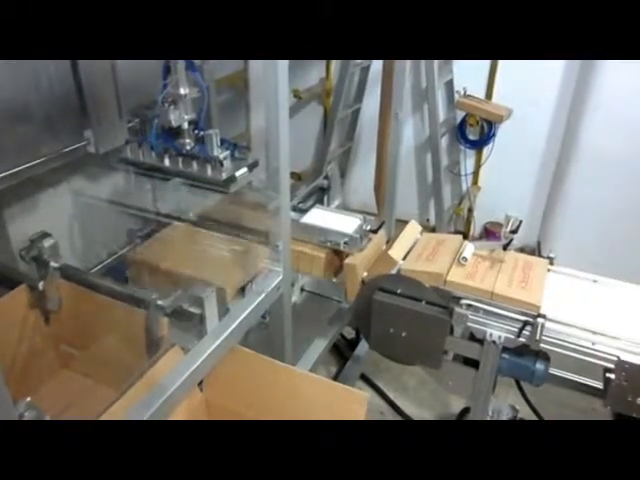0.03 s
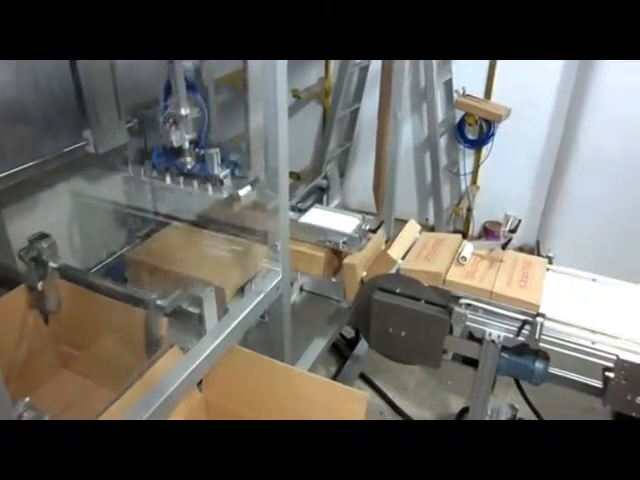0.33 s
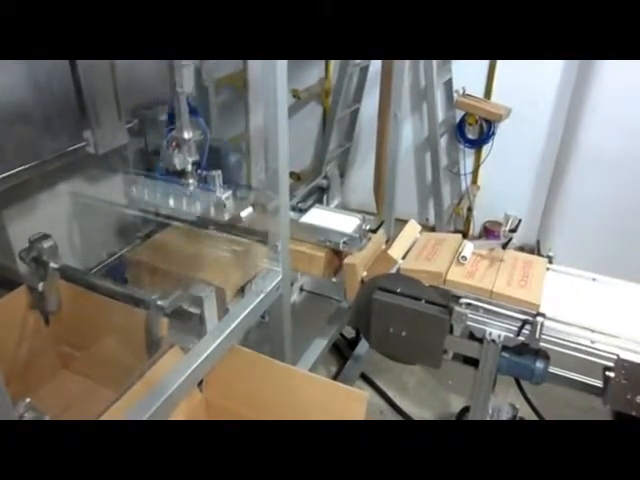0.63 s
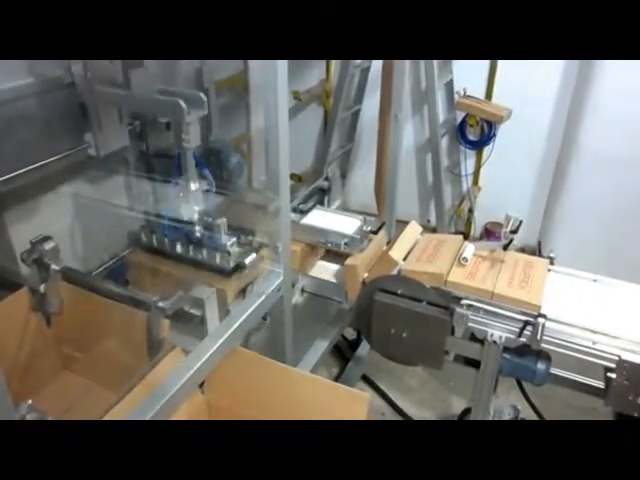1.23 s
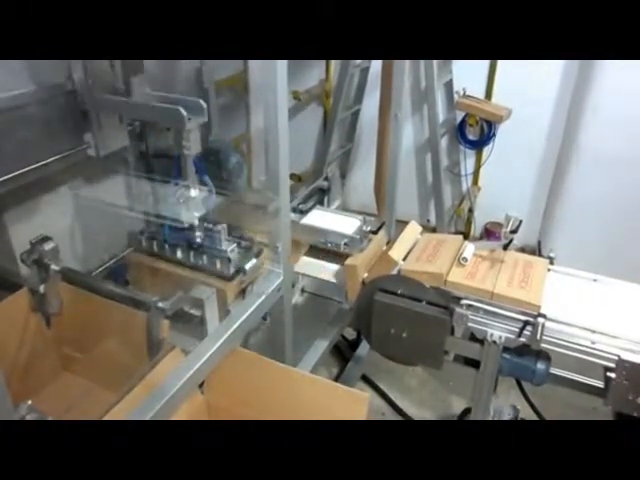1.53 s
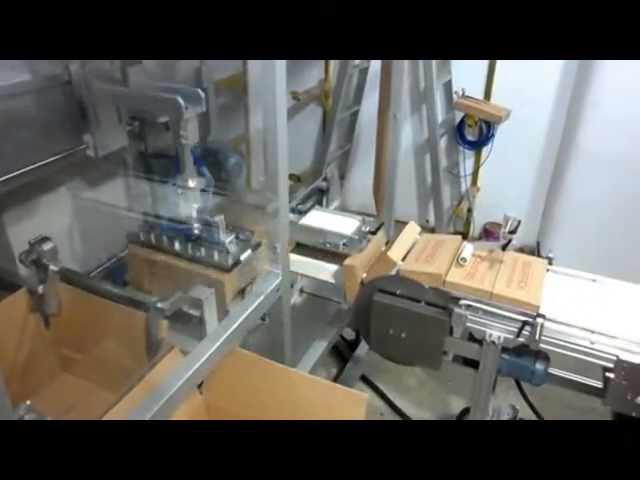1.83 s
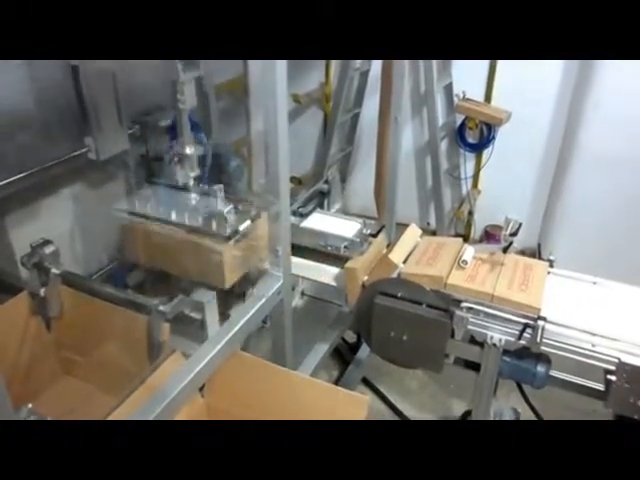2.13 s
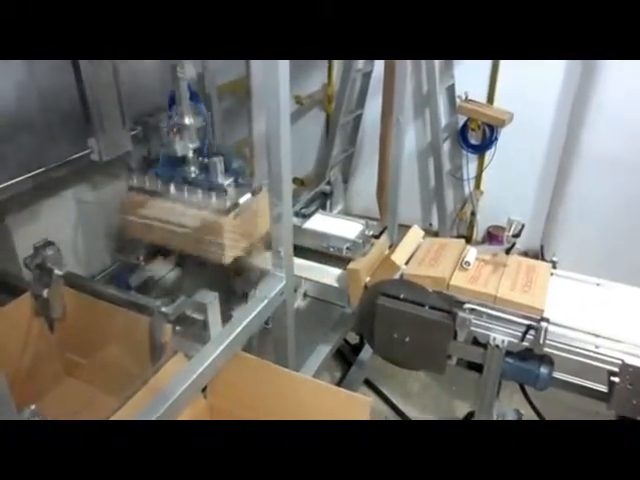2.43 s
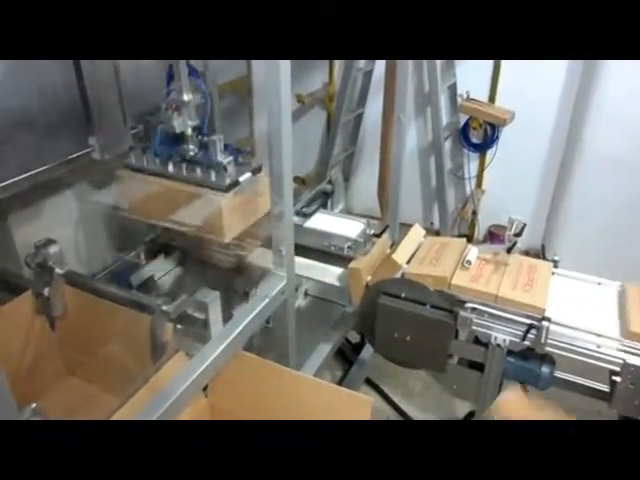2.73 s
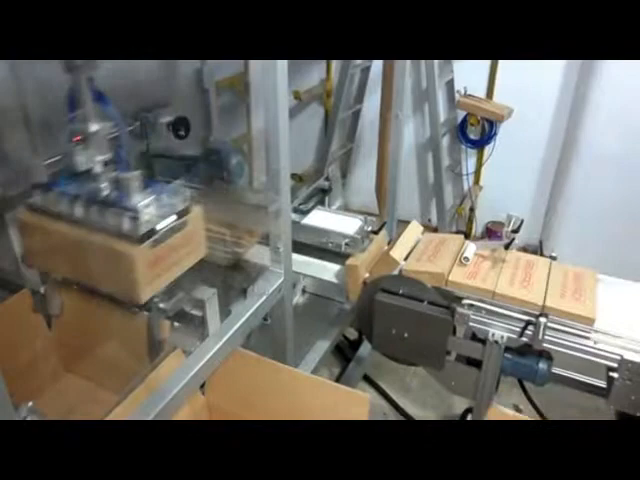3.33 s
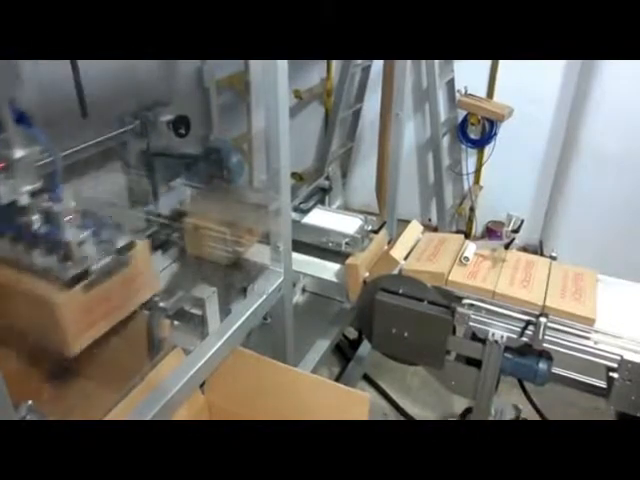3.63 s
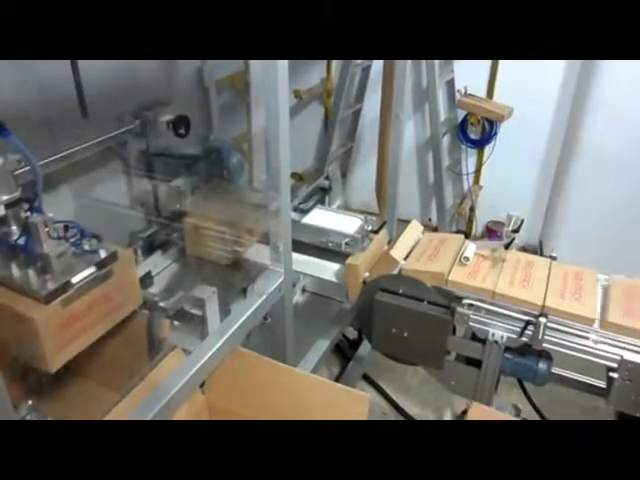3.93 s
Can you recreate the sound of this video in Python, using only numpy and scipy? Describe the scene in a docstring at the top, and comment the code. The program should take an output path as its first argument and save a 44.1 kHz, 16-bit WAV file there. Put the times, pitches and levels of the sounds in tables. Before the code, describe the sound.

A pneumatic gripper hisses loudly with suction, after a dull knock, puffs of air and a few clacks. Drives hum and a carton bumps under the hiss, over packing line rumble in a hard-walled factory room.

```python
"""A dull knock and a puff of exhaust air: a pneumatic gripper comes down over the rumble and hum of a
carton packing line. Its vacuum ejector opens with a loud hiss that narrows as the cups seal; one drive
hums as the carton is lifted, another as it swings aside and the head comes closer.
Heard in a hard-walled factory room, on a closely spaced pair of microphones."""
import sys
import numpy as np
from scipy import signal
from scipy.fft import rfft, irfft
from scipy.io import wavfile
from scipy.ndimage import uniform_filter1d

SR = 44100
rng = np.random.default_rng(int(sys.argv[2]) if len(sys.argv) > 2 else 0)


def store_pcm(level_fs):
    """Save levels as 16-bit WAV."""
    pcm = np.round(np.clip(level_fs, -1, 1) * 32767).astype(np.int16)
    wavfile.write(sys.argv[1], SR, np.atleast_2d(pcm).T)


N = 176400
T = np.arange(N) / SR

# Air leaving a valve. Each row: frequency in Hz, relative level in dB.
VALVE_AIR = [(300, -25), (1500, 2), (3000, 3), (4000, -2), (4800, 2.5), (5500, 2.5)]
# The dull body of a knock. Each row: frequency in Hz, relative level in dB.
THUD_SPECTRUM = [(25, -7.5), (70, -12), (130, 2.5), (200, -0.5), (300, 4), (420, -1), (800, -3),
                 (1150, -15), (5000, -34.5)]


def amp(db):
    """Decibels to gain."""
    return 10 ** (np.asarray(db) / 20)


def unit(x):
    """Scales to rms 1."""
    return x / np.sqrt(np.mean(x ** 2) + 1e-20)


def read(points, hz):
    """Reads a curve on a log-frequency axis."""
    f, value = np.transpose(points)
    return np.interp(np.log(hz + 1), np.log(f + 1), value)


def fader(points):
    """Gain over time, through points of seconds and dB."""
    return amp(np.interp(T, *np.transpose(points)))


def burst(start, db, rise, t60, hold=0):
    """Gain that rises, then dies away from hold seconds after its start."""
    return np.clip((T - start) / rise, 0, 1) * amp(db - 60 * np.maximum(T - start - hold, 0) / t60)


def add(mix, start, sound):
    """Mixes a sound in at a start in seconds."""
    part = mix[max(round(start * SR), 0):][:len(sound)]
    part += sound[:len(part)]


def colour(x, db_at):
    """Filters by a function from Hz to dB."""
    return irfft(rfft(x) * amp(db_at(np.fft.rfftfreq(len(x), 1 / SR))), len(x))


def noise(db_at, size=N):
    """Coloured noise of rms 1."""
    return unit(colour(rng.standard_normal(size), db_at))


def band(hz, width_hz):
    """Noise in one resonance."""
    return noise(lambda f: -20 * np.log10(1 + ((f - hz) / width_hz) ** 2))


def turbulence(spectrum, patchy_db, ripple_db, flutter_db=0):
    """Air noise with brief patches, a shared flutter and slow ripples from nearby reflections."""
    frames, hz = N // 256 + 5, np.fft.rfftfreq(1024, 1 / SR)
    real, imag, patch, ripple = rng.standard_normal((4, frames, 513))
    patch = uniform_filter1d(patch, size=8, axis=0)
    patch = unit(uniform_filter1d(patch, size=10, axis=1))
    ripple = unit(uniform_filter1d(ripple, size=110, axis=0))
    flutter = unit(uniform_filter1d(rng.standard_normal(frames), size=7))[:, None]
    db = read(spectrum, hz) + patchy_db * patch + flutter_db * flutter + ripple_db * ripple
    bins = (real + 1j * imag) * amp(db)
    return unit(signal.istft(bins.T, nperseg=1024, noverlap=768)[1][:N])


def tone(hz, width_hz, rough):
    """A wavering sine with a narrow skirt of noise, on a steady or moving pitch."""
    phase = 2 * np.pi * np.cumsum(hz + .5 * width_hz * band(0, width_hz)) / SR
    wavering = (1 + rough * band(0, width_hz)) * np.sin(phase)
    return unit(wavering + rough * band(0, width_hz) * np.cos(phase))


def ring(modes, t):
    """Dying modes of a struck part. Each row: frequency in Hz, relative level in dB, t60 in seconds."""
    return np.sqrt(2) * sum(amp(db - 60 * t / t60) * np.sin(2 * np.pi * (hz * t + rng.random()))
                            for hz, db, t60 in modes)


def room(x):
    """The hard walls return a diffuse tail, each band dying at its own speed."""
    # Each row: frequency in Hz, reverberation time in seconds.
    decay = [(100, 1), (500, 0.72), (6000, 0.64)]
    hz, t, bins = signal.stft(rng.standard_normal(SR), SR, nperseg=256)
    bins = bins * (t > .012) * amp(-60 * t / read(decay, hz)[:, None])
    tail = signal.istft(bins, SR, nperseg=256)[1]
    return signal.fftconvolve(x, tail / np.linalg.norm(tail))[:N]


def factory():
    """Room tone: the rumble and motor hum of the running line."""
    # Steady motors. Each row: pitch in Hz, width in Hz, level in dB.
    motors = [(146.5, 11.4, -47.5), (208.2, 9.2, -47), (265.4, 10, -44.5), (465, 11, -43.5),
              (1042, 40, -47.5)]
    # The broad rumble and the deep one. Each row: frequency in Hz, relative level in dB.
    rumble_spectrum = [(60, -15), (180, -3), (260, 1.5), (390, -1.5), (620, 1), (880, 0.5), (1300, -6),
                       (2000, -5), (2700, -5.5), (3600, -15.5), (5700, -24)]
    bass_spectrum = [(20, -1), (44, 0.5), (62, 0), (82, -5), (108, 1), (150, -1.5), (190, -12.5),
                     (400, -25.5)]
    # Swells of the deep rumble. Each row: time in seconds, level in dB.
    bass_level = [(0, -32.5), (.45, -41.5), (.68, -34.5), (1.0, -42.5), (1.45, -37.5), (2.1, -42),
                  (2.85, -44), (3.1, -37), (3.55, -35), (4, -41.5)]
    hum = sum(amp(db) * tone(hz, width, rough=.6) for hz, width, db in motors)
    bass = fader(bass_level) * noise(lambda f: read(bass_spectrum, f))
    rumble = turbulence(rumble_spectrum, patchy_db=1.54, ripple_db=1.55, flutter_db=.65)
    return hum + bass + amp(-31.5) * rumble


def drives():
    """The lift drive hums, the swing drive whines in surges, and fainter whines go with each move."""
    # The lift runs up, holds and brakes. Each row: time in seconds, pitch in Hz, level in dB.
    lift_run = [(1.89, 266.7, -46), (1.95, 283.8, -34.5), (2.57, 285.2, -36.5), (2.68, 268, -52)]
    # The swing surges as it starts and as it brakes. Each row: time in seconds, level in dB.
    swing_level = [(3.05, -46), (3.11, -33.5), (3.2, -40.5), (3.43, -44.5), (3.52, -35.5), (3.78, -41),
                   (4, -34)]
    # Fainter whines. Each row: start and end in seconds, pitch and width in Hz, level in dB.
    moves = [(0.526, 1.18, 275.8, 14.5, -40), (0.902, 1.45, 532, 4.9, -41.5), (1.952, 2.76, 712, 9, -43.5),
             (2.046, 2.807, 560, 9, -44.5), (3.012, 3.752, 548, 9.5, -42), (3.15, 3.45, 1221, 5.3, -35.5)]
    times, hz, db = np.transpose(lift_run)
    lift = tone(np.interp(T, times, hz), width_hz=7, rough=.21)
    lift *= np.interp(T, times, amp(db), left=0, right=0)
    times, db = np.transpose(swing_level)
    swing = np.interp(T, times, amp(db), left=0) * tone(hz=458, width_hz=15.6, rough=.25)
    whines, ramp_s = np.zeros(N), .13
    for start, end, hz, width, db in moves:
        fade = np.clip(np.minimum(T - start, end - T) / ramp_s, 0, 1)
        whines += amp(db) * fade * tone(hz, width, rough=.3)
    return lift + swing + whines


def cup_leak(vacuum_on_s):
    """Once the vacuum is on, air whistles past the lips of the cups."""
    # Each row: time in seconds, level in dB.
    leak_level = [(1.6, -56), (2.0, -38.5), (2.6, -36), (3.3, -37), (3.55, -32), (3.75, -41.5)]
    return (T > vacuum_on_s) * fader(leak_level) * band(hz=3060, width_hz=51)


def valves():
    """Each valve opens with a tick and a bright spit of air."""
    # Each row: start in seconds, level of the spit in dB.
    openings = [(.632, -35), (1.372, -29.5)]
    tick = sum(burst(start, db - 3.5, rise=.0044, t60=.04) for start, db in openings)
    spit = sum(burst(start, db, rise=.0044, t60=.3) for start, db in openings)
    return tick * noise(lambda f: read(VALVE_AIR, f)) + spit * band(hz=5560, width_hz=200)


def exhaust():
    """A valve vents the cylinder: quick rise, hold, and fade as the pressure falls."""
    # Each row: start in seconds, hold in seconds, level in dB.
    puffs = [(-.1, 0.09, -25.5), (0.634, 0.14, -30.5)]
    level = sum(burst(start, db, rise=.009, t60=.79, hold=hold) for start, hold, db in puffs)
    return level * noise(lambda f: read(VALVE_AIR, f))


def carton():
    """The hollow carton bumps as it leaves the belt and as the lift stops."""
    # Each row: start in seconds, level in dB.
    bumps = [(1.749, -22.5), (2.777, -27.5)]
    # Each row: frequency in Hz, relative level in dB, t60 in seconds.
    carton_modes = [(246.7, -1, 0.25), (283, -5, 0.22), (334.6, 1.5, 0.18), (397, -6.5, 0.18),
                    (760, -5.5, 0.18), (851, -4, 0.16)]
    out, t = np.zeros(N), np.arange(SR) / SR
    rise, scuff_t60 = np.minimum(t / .0035, 1), carton_modes[0][2]
    for start, db in bumps:
        scuff = noise(lambda f: read(THUD_SPECTRUM, f), size=SR) * amp(-4.5 - 60 * t / scuff_t60)
        add(out, start, amp(db) * rise * (ring(carton_modes, t) + scuff))
    return out


def gripper():
    """Knocks ring the frame, the linkage clacks and the cylinder meets its end stop."""
    # Each row: start in seconds, level in dB, thud's t60 in seconds, its tilt in dB per octave.
    knocks = [(0.0, -20.5, .48, 0.5), (.068, -26, 0.73, 1.5), (.165, -30, 0.24, 0.5), (.272, -32, .12, -4),
              (.651, -19.5, 0.12, -1), (.68, -24, 0.25, -0.5), (0.734, -24.5, 0.2, -4),
              (1.374, -24, 0.37, 3.5), (1.402, -22.5, 0.48, -2), (3.579, -29, .11, -0.5),
              (3.969, -32.5, 0.2, 3)]
    # Each row: start in seconds, level in dB, centre in Hz, t60 in seconds.
    clacks = [(.328, -31, 2180, 0.2), (.537, -29, 1580, 0.21), (.555, -29.5, 510, 0.24),
              (.775, -18, 830, 0.06), (2.779, -26, 900, 0.09), (3.418, -17.5, 1030, 0.055),
              (3.97, -27, 850, .15)]
    # Ringing of frame and end stop. Each row: frequency in Hz, relative level in dB, t60 in seconds.
    frame_modes = [(289.8, -2.5, 0.31), (329, -4, 0.2), (532.5, -7, 0.16), (769, -9, 0.092)]
    stop_modes = [(424, -1, 0.14), (592, -8, 0.14), (874, -2.5, 0.18)]
    out, t = np.zeros(N), np.arange(SR) / SR
    rise, clack_octaves = np.minimum(t / .0039, 1), .42
    for start, db, t60, tilt in knocks:
        thud = noise(lambda f: read(THUD_SPECTRUM, f) + tilt * np.log2(f + 1), size=SR)
        thud *= amp(-2 - 60 * t / t60)
        add(out, start, amp(db) * rise * (thud + amp(-3.5) * ring(frame_modes, t)))
    for start, db, hz, t60 in clacks:
        clack = noise(lambda f: -20 * np.log10(1 + (np.log2((f + 1) / hz) / clack_octaves) ** 2), SR)
        add(out, start, rise * amp(db - 60 * t / t60) * clack)
    add(out, start=.795, sound=amp(-23) * rise * ring(stop_modes, t))
    return out


def panels(x):
    """Echoes off the nearby guard panels arrive 3 to 35 ms late and comb the hiss."""
    taps = np.zeros(SR)
    signs = rng.choice([-1, 1], size=24)
    delays_s = rng.uniform(.003, .035, size=24)
    taps[(delays_s * SR).astype(int)] = signs
    echoes = signal.fftconvolve(x, taps / np.linalg.norm(taps))[:N]
    return unit(x + amp(-9.5) * echoes)


def ejector(vacuum_on_s):
    """The jet snaps on, changes colour as the cups seal and brightens as the head swings closer."""
    # The jet with cups open and sealed. Each row: frequency in Hz, relative level in dB.
    open_spectrum = [(100, -22.5), (700, 4), (1100, -0.5), (1600, -2.5), (2000, 1), (2250, 5.5), (2550, -3),
                     (3050, 0.5), (3500, -5.5), (4400, -7.5), (4750, -3.5), (5600, -4)]
    sealed_spectrum = [(100, -26), (400, -13), (700, -4), (920, -3.5), (1060, -0.5), (1350, -5), (1850, -6),
                       (2300, -2.5), (2750, -1.5), (3150, -2.5), (3400, -6.5), (4000, -8.5), (4900, -9),
                       (5350, -7.5), (5700, -13)]
    # Strength of the jet. Each row: time in seconds, level in dB.
    jet_level = [(1.37, -22.5), (1.45, -18), (1.54, -17.5), (1.7, -22), (2.2, -23.5), (2.6, -23.5),
                 (3.1, -23), (3.42, -23.5), (3.55, -23.5), (4, -24.5)]
    rise_s, seal_s, sealing_s, approach_s = .0099, 1.62, .12, 3.45
    sealed = .5 + .5 * np.tanh((T - seal_s) / sealing_s)
    jet = np.sqrt(1 - sealed) * turbulence(open_spectrum, patchy_db=1.5, ripple_db=1.5)
    jet += np.sqrt(sealed) * turbulence(sealed_spectrum, patchy_db=.5, ripple_db=2.5)
    near = np.sqrt(np.clip((T - approach_s) / (T[-1] - approach_s), 0, 1))
    jet = panels(jet) + amp(-4.5) * near * band(hz=2630, width_hz=360)
    return jet * np.clip((T - vacuum_on_s) / rise_s, 0, 1) * fader(jet_level)


def scene():
    """All sources reach a closely spaced pair of microphones, the jet slightly to the right."""
    # A faint stereo spread; the low end is near mono at first, then wider from about 1.36 s. Each row:
    # frequency in Hz, gain into the side signal in dB.
    base_spread = [(100, -47), (280, -67), (1300, -25), (5000, -25.5)]
    later_spread = [(60, 2), (200, -11), (700, -24), (5000, -24)]
    vacuum_on_s, jet_right_db = 1.364, .75
    hits = gripper() + carton()
    jet = ejector(vacuum_on_s)
    machinery = factory() + exhaust() + valves() + cup_leak(vacuum_on_s) + drives()
    machinery += hits + amp(-2.5) * room(hits)
    side = colour(room(machinery), lambda f: read(base_spread, f))
    side += colour(room(jet), lambda f: read(later_spread, f))
    left = machinery + jet * amp(-jet_right_db / 2) + side
    right = machinery + jet * amp(jet_right_db / 2) - side
    return np.array([left, right])


def record(dry):
    """A steep low-pass takes the top off both microphones."""
    lowpass = signal.firwin(2047, cutoff=5660, window=("kaiser", 9), fs=SR)
    return signal.oaconvolve(dry, lowpass[None], "same")


dry = scene()
out = record(dry)
store_pcm(out)
```